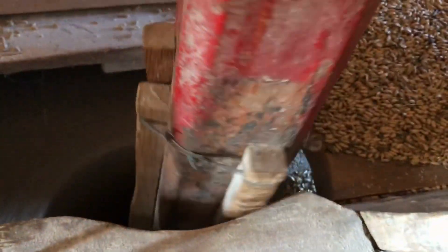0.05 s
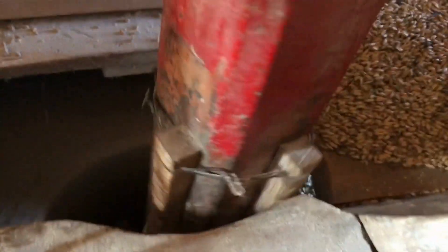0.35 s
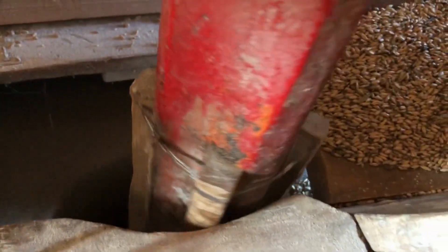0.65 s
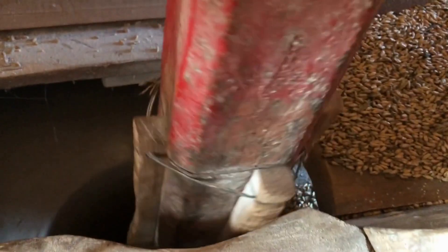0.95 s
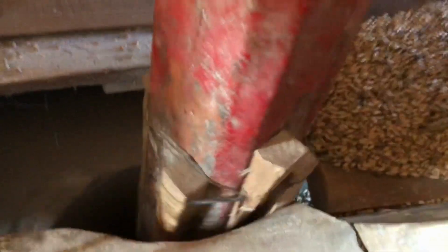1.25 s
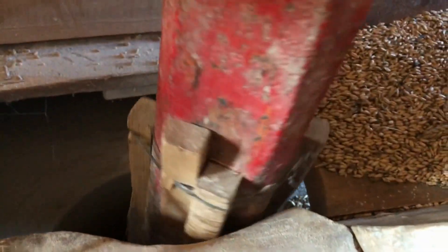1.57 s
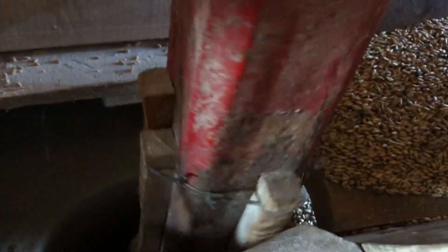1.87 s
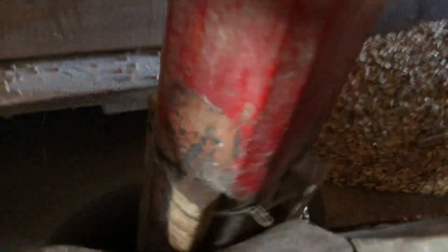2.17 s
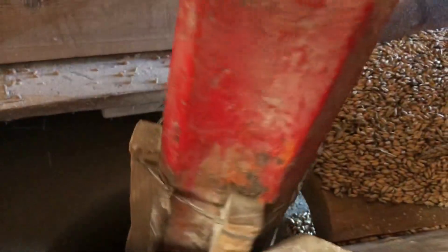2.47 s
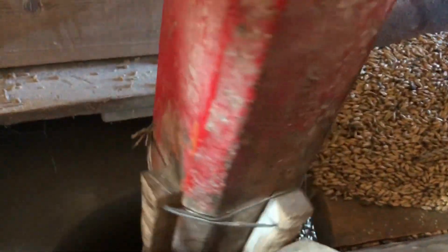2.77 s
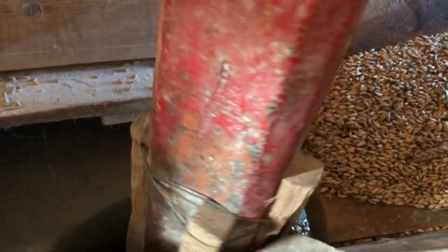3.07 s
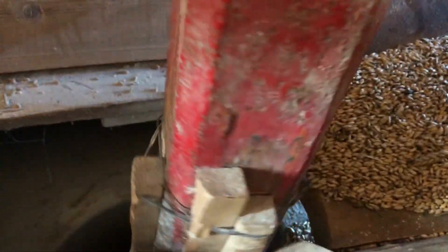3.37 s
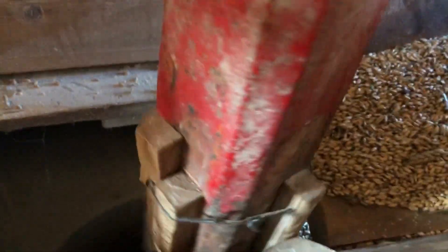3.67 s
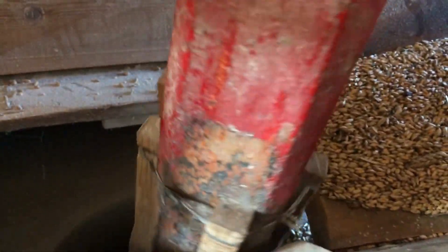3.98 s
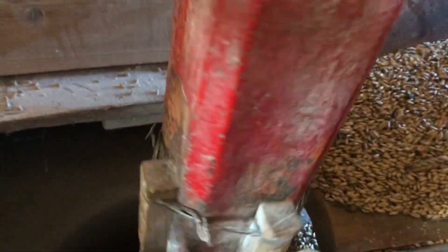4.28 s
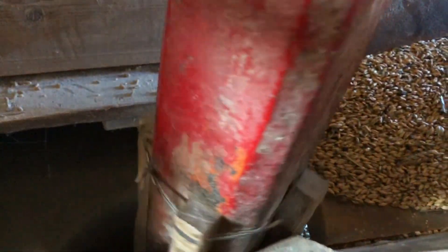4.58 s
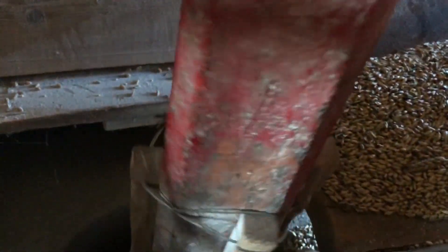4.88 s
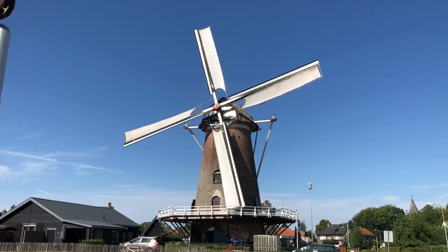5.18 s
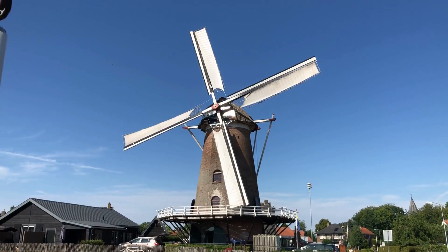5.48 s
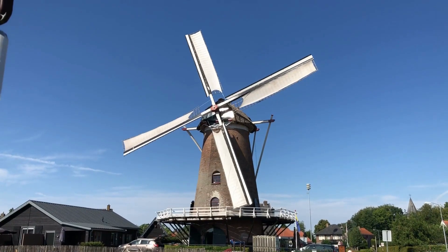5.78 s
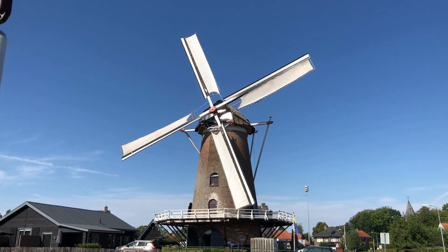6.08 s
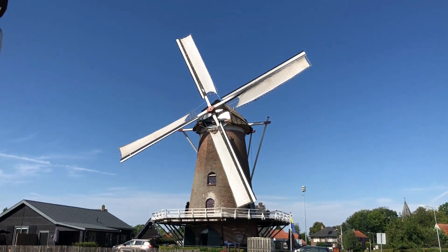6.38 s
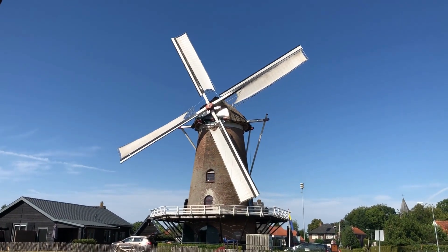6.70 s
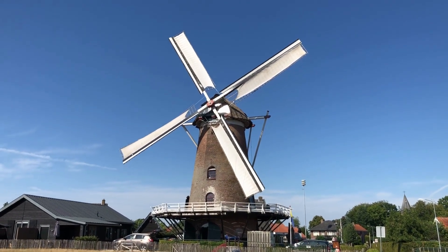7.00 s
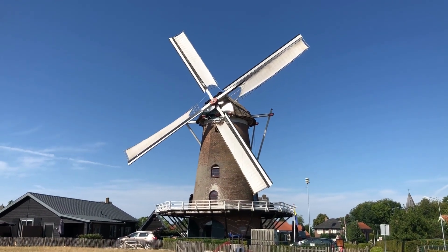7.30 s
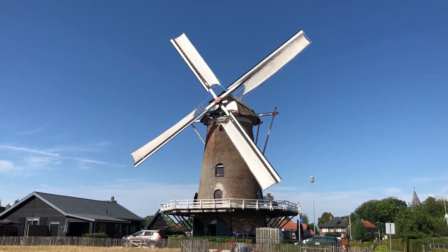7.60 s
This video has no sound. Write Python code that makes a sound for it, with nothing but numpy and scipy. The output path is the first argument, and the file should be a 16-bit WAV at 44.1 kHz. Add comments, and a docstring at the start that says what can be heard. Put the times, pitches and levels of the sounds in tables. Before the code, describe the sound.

A windmill's stones grind grain under regular wooden knocks and wire clinks, then everything drops suddenly to faint outdoor wind and traffic.

```python
"""A windmill's runner stone grinding grain, heard close by on the stone floor, with the wooden gearing
rumbling through casing and boards. The square shaft knocks the feed shoe four times a turn; the blocks
wired to the shoe chatter, the wire clinks and kernels tick down.
Then the scene cuts to the quiet outdoors: distant traffic, two soft gusts on the microphone,
a bird and a few faint sounds far off."""
import sys
import numpy as np
from scipy import signal
from scipy.fft import rfft, irfft, next_fast_len
from scipy.io import wavfile
from scipy.ndimage import uniform_filter1d, minimum_filter1d

SR = 44100
rng = np.random.default_rng(int(sys.argv[2]) if len(sys.argv) > 2 else 0)


def inscribe(sig):
    """Save sig as 16-bit PCM at rate SR to the path in sys.argv[1].

    A 1-D sig is mono; a 2-D sig holds one channel per row.
    Samples are clipped to [-1, 1] before scaling.
    """
    pcm = np.round(np.clip(np.atleast_2d(sig).T, -1, 1) * 32767)
    wavfile.write(sys.argv[1], SR, pcm.astype(np.int16))


N = 346185

# Colour of small hard ticks. Each row: frequency in Hz, spectral level in dB.
TICK_COLOUR = [(2000, -17.5), (4300, -7.5), (5500, 2), (7500, 0), (10000, -6), (12000, -5.5), (16000, -2.5)]
# A corner of the shaft pushes the shoe aside. Each row: time in seconds, then levels in dB
# of the shoe's groan, the frame's thud and the wire's buzz.
SHAFT_CORNERS = [(.385, -28, -22, -2), (.865, -23, -29.5, -0.5), (1.33, -27.5, -27, 4.5),
                 (1.776, -23.5, -26, -5), (2.275, -32, -21, -0.5), (2.765, -23, -29.5, 1),
                 (3.25, -33, -28.5, -0.5), (3.74, -26, -25, -0.5), (4.205, -28.5, -20.5, 0),
                 (4.719, -25, -35, -2.5)]


def from_db(db):
    """Decibels to gain."""
    return 10 ** (np.asarray(db) / 20)


def rms_one(x):
    """Scale to unit rms."""
    return x / np.sqrt(np.mean(x ** 2) + 1e-20)


def clock():
    """Time of every sample in seconds."""
    return np.arange(N) / SR


def curve(points):
    """Straight lines through (seconds, value) points, at every sample."""
    return np.interp(clock(), *np.transpose(points))


def noise(colour):
    """Unit-rms noise shaped by (Hz, dB) points, rolled off below the first."""
    hz, level_db = np.transpose(colour)
    size = next_fast_len(N)
    bins = np.maximum(np.arange(size // 2 + 1) * SR / size, 1)
    gain = from_db(np.interp(np.log(bins), np.log(hz), level_db)) * np.minimum(bins / hz[0], 1) ** 2
    return rms_one(irfft(rfft(rng.standard_normal(size)) * gain, size)[:N])


def drift(per_s):
    """Unit-rms wander between random values."""
    knots = rng.standard_normal(4000)
    return rms_one(np.interp(clock() * per_s, np.arange(len(knots)), knots))


def resonate(x, hz, width_hz):
    """Two equal resonators in series, with gain 1 at the peak."""
    r = np.exp(-np.pi * width_hz / SR)
    b, a = np.array([1, 0, -1]) * (1 - r * r) / 2, [1, -2 * r * np.cos(2 * np.pi * hz / SR), r * r]
    return signal.lfilter(b, a, signal.lfilter(b, a, x + 1e-18))


def body(modes):
    """Resonances (Hz, width in Hz, dB), each shaken by its own random force; unit rms."""
    shaken = [from_db(db) * resonate(rng.standard_normal(N), hz, 2 * width) for hz, width, db in modes]
    return rms_one(sum(shaken))


def ring(force, hz, t60):
    """One mode: a unit impulse starts a sine of height 1 that falls 60 dB in t60 seconds."""
    r, w = from_db(-60 / (t60 * SR)), 2 * np.pi * hz / SR
    return signal.lfilter([0, np.sin(w)], [1, -2 * r * np.cos(w), r * r], force + 1e-18)


def steady(x, span_s, share):
    """Even out a share of the swells of a noise; unit rms."""
    power = uniform_filter1d(x ** 2, max(int(span_s * SR), 2))
    return rms_one(x / (np.abs(power) + 1e-6) ** (share / 2))


def clicks(times, level_db, sign=1):
    """One impulse for each event."""
    out = np.zeros(N)
    out[np.round(np.asarray(times) * SR).astype(int)] = sign * from_db(level_db)
    return out


def fade(hits, t60):
    """Envelope of impulses whose energy falls 60 dB in t60 seconds."""
    return np.sqrt(signal.lfilter([1], [1, -10 ** (-6 / (t60 * SR))], hits ** 2 + 1e-18))


def swell(envelope, rise_s):
    """Round off an attack."""
    r = np.exp(-1 / (rise_s * SR))
    return signal.lfilter([1 - r], [1, -r], envelope)


def hump(peak_s, half_s):
    """Bell-shaped envelope, down to 1/e at half_s either side of its peak."""
    return np.exp(-np.minimum(((clock() - peak_s) / half_s) ** 2, 20))


def surge(peak_s, rise_s, fall_s):
    """Envelope that rises and falls exponentially about a sharp peak."""
    late = clock() - peak_s
    return np.exp(-np.minimum(np.maximum(-late / rise_s, late / fall_s), 20))


def rough_tones(rows):
    """Short bands of noise that swell and fade."""
    out = np.zeros(N)
    for s, hz, width_hz, half_s, db in rows:
        tone = rms_one(resonate(rng.standard_normal(N), hz, width_hz))
        out += from_db(db) * tone * hump(s, half_s)
    return out


def distance():
    """Far-off traffic hums in the open air, with a few faint, brief sounds."""
    # Colour of the hum. Each row: frequency in Hz, spectral level in dB.
    traffic = [(15, -53), (25, -20), (43, -16), (61, 0), (80, 0.5), (108, -12.5), (141, -4), (223, -8.5),
               (293, -13), (363, -12), (489, -17), (863, -22), (962, -25), (5880, -30.5), (16000, -41)]
    # Each row: peak time in seconds, pitch in Hz, width in Hz, half-length in seconds, level in dB.
    far_sounds = [(6.3, 860, 60, 0.083, -73), (7.135, 1930, 1000, 0.051, -77),
                  (7.635, 1304, 1400, 0.019, -66)]
    return from_db(-63) * noise(traffic) + rough_tones(far_sounds)


def bird(fall_hz_per_s=9800):
    """A distant bird gives short, raspy notes that glide down."""
    # Each row: peak time in seconds, pitch in Hz, level in dB.
    chirps = [(6.745, 3480, -81), (7.103, 2125, -75), (7.13, 2080, -73), (7.162, 2050, -78),
              (7.165, 2500, -78)]
    out, rasp = np.zeros(N), .9 * drift(450)
    for s, hz, db in chirps:
        t = clock() - s
        note = np.sqrt(2) * np.sin(2 * np.pi * (hz - fall_hz_per_s * t / 2) * t + rasp)
        out += from_db(db) * note * hump(s, half_s=.013)
    return out


def breeze(lumps_db=1.0):
    """Wind reaches the microphone in short, lumpy buffets, two of them stronger."""
    # Each row: peak time in seconds, level in dB.
    buffets = [(5.96, -60), (6.22, -65), (6.65, -62), (6.79, -55), (6.89, -46.5), (7.01, -54), (7.125, -59),
               (7.425, -61), (7.49, -60), (7.605, -46), (7.67, -53), (7.755, -55), (7.835, -57)]
    # Each row: frequency in Hz, spectral level in dB.
    wind_colour = [(25, -7), (65, 3), (105, -3), (160, -3), (250, -15), (400, -34), (1200, -40),
                   (5000, -72)]
    gusts = sum(from_db(db) * surge(s, rise_s=.027, fall_s=.036) for s, db in buffets)
    return gusts * from_db(lumps_db * drift(40)) * steady(noise(wind_colour), span_s=.061, share=.79)


def squeaks():
    """Wood rubs with a thin squeak."""
    # Each row: peak time in seconds, pitch in Hz, width in Hz, half-length in seconds, level in dB.
    rubs = [(3.075, 4240, 400, .018, -41), (3.08, 2760, 400, .03, -44), (3.108, 4170, 400, .008, -39)]
    return rough_tones(rubs)


def kernels(per_s=30, spread_db=4.5, skitter_db=-10):
    """Kernels drop at random, tick on the stone and skitter on."""
    # Level of the kernel ticks, which grow fainter. Each row: time in seconds, level in dB.
    tick_levels = [(0, -46.5), (1.8, -45.5), (2.6, -53), (3.4, -54), (5.04, -60.5)]
    drops = rng.random(N) < per_s / SR
    hits = drops * from_db(curve(tick_levels) + spread_db * np.clip(rng.standard_normal(N), -2, 2))
    return noise(TICK_COLOUR) * (fade(hits, t60=.024) + from_db(skitter_db) * fade(hits, t60=.12))


def wire_clinks(tick_db=-4, grain_db=3, ring_db=-3, fade_in_db=-8, width_hz=170):
    """The wire clinks: a grainy tick and a ring that fades in briefly."""
    # Each row: time in seconds, level in dB, place on the wire.
    clinks = [(0.145, -35, "long"), (.203, -40, "slack"), (0.251, -40, "slack"), (.613, -40, "long"),
              (0.638, -35.5, "long"), (0.756, -37, "taut"), (.794, -44, "short"), (1.1, -33.5, "taut"),
              (1.147, -37.5, "long"), (1.202, -38.5, "taut"), (1.591, -31, "slack"), (1.65, -29, "slack"),
              (1.678, -34, "long"), (1.747, -28.5, "taut"), (1.974, -44, "slack"), (2.031, -41, "short"),
              (2.545, -36, "long"), (3.045, -32, "taut"), (3.508, -30, "slack"), (3.591, -27, "slack"),
              (3.6, -33.5, "slack"), (3.697, -32.5, "taut"), (4.086, -33, "short"), (4.49, -29, "long")]
    # Each entry: a place on the wire and the frequencies of its modes in Hz.
    wire_modes = {"long": (3000, 4850, 5500, 9950), "slack": (7000, 7600, 8350),
                  "taut": (9150, 10450, 11300), "short": (9400, 10800, 13560)}
    out = np.zeros(N)
    tick = from_db(tick_db) * rms_one(noise(TICK_COLOUR) * from_db(grain_db * drift(370)))
    for place, modes_hz in wire_modes.items():
        hits = sum(clicks(s, db) for s, db, where in clinks if where == place)
        fade_in = from_db(fade_in_db) * fade(hits[::-1], t60=.051)[::-1]
        decay = fade(hits, t60=.07)
        modes = body([(hz, width_hz, 0) for hz in modes_hz])
        rings = from_db(ring_db) * steady(modes, span_s=.0054, share=.8)
        out += tick * swell(decay, rise_s=.00082) + rings * swell(decay + fade_in, rise_s=.0008)
    return out


def wire_buzz(hits, twang_db=-18.5, settle_db=-23, rough_db=4.5):
    """The wire twangs at each hit and buzzes on while the blocks settle."""
    # Each row: frequency in Hz, width in Hz, level in dB.
    buzz_modes = [(3915, 180, 11), (6230, 2400, -2), (9200, 400, -2), (11300, 350, -5.5),
                  (14240, 3700, -13)]
    shake = np.hypot(from_db(twang_db) * fade(hits, t60=.062), from_db(settle_db) * fade(hits, t60=.38))
    looseness = from_db(curve([(s, db) for s, _, _, db in SHAFT_CORNERS]))
    buzz = rms_one(steady(body(buzz_modes), span_s=.012, share=.7) * from_db(rough_db * drift(130)))
    return looseness * swell(shake, rise_s=.00082) * buzz


def block_chatter(crack_db=1.5, crack_t60=.011, grit_rough_db=2, ring_db=-12, clack_spread_db=3,
                  rebounds_per_s=100, rebound_db=-29):
    """Loose blocks snap against the shoe: each contact cracks, rings, clacks and shakes the wire."""
    # A cluster of contacts to each knock. Each row: time in seconds, level in dB.
    contacts = [(0.3755, -23), (0.383, -25), (0.388, -11.5), (0.406, -11.5), (0.413, -11.5), (.447, -27.5),
                (.4686, -27.5), (0.8454, -19.5), (.8534, -30), (0.8573, -14.5), (0.866, -25.5),
                (0.8757, -20), (0.884, -20.5), (.903, -29), (0.906, -31.5), (1.3323, -14.5), (1.338, -33.5),
                (1.3506, -13), (1.3863, -24.5), (1.399, -30), (1.407, -32), (1.7826, -10.5), (1.7858, -18),
                (1.805, -18), (1.8198, -13), (1.8257, -30), (2.2801, -12.5), (2.298, -11.5), (2.3096, -18),
                (2.3234, -25.5), (2.330, -24), (2.3358, -20), (2.3505, -27), (2.372, -33), (2.746, -13),
                (2.749, -24.5), (2.754, -15), (2.788, -32), (3.246, -12), (3.2517, -23.5), (3.2642, -14),
                (3.290, -32), (3.302, -24), (3.73, -16), (3.7345, -13.5), (3.7515, -22.5), (3.7636, -20.5),
                (4.204, -15.5), (4.2086, -14), (4.215, -17.5), (4.233, -11.5), (4.242, -10), (4.2592, -22),
                (4.7069, -16.5), (4.712, -13.5), (4.7182, -17.5), (4.731, -27), (4.7373, -32.5),
                (4.773, -36)]
    # Ring of the wired blocks, and their wooden clack. Each row: Hz, level in dB, t60 in seconds.
    ring_modes = [(3855, -6, .06), (3950, -8, .06), (4065, -11, .1), (5250, -15, .04), (5900, -11, .03),
                  (6150, -11, .03), (6930, -11, .045), (7480, -9, .035), (9020, 1, .03), (9115, 1, .04),
                  (9395, -.5, .045), (10130, -12, .04), (10440, -5, .04), (10920, -6, .045),
                  (11270, -3, .03), (11390, -4, .035), (11610, -4, .035), (12780, -12, .04)]
    clack_modes = [(930, -16.5, .035), (1036, -15, .04), (1270, -18.5, 0.024), (1520, -17.5, .035),
                   (1720, -15, 0.026), (2220, -25, 0.024), (2660, -27, 0.018), (3270, -25.5, 0.038)]
    # Colour of the crack. Each row: frequency in Hz, spectral level in dB.
    grit_colour = [(1200, -5), (2200, -10), (3200, -12), (3900, -9.5), (4700, -17), (6000, -9.5),
                   (7500, -8), (8100, -17), (8650, -8), (9100, 7), (9450, 3), (9800, -10), (10400, -1),
                   (10700, -5), (11300, 5), (11750, 1), (12300, -16), (12750, -6), (13300, -12),
                   (16000, -14)]
    times, contact_db = np.transpose(contacts)
    hits = clicks(times, contact_db)
    rebounds = (rng.random(N) < rebounds_per_s / SR) * from_db(rebound_db) * fade(hits, t60=.1)
    pressure = swell(fade(hits + rebounds, crack_t60), rise_s=.00066)
    # a gritty push with the energy of one impulse gives each mode a strength of its own
    force = pressure * rng.standard_normal(N) / np.sqrt(crack_t60 * SR / np.log(10 ** 6))
    rings = sum((-1) ** k * from_db(db + ring_db) * ring(force, hz, t60)
                for k, (hz, db, t60) in enumerate(ring_modes))
    grit = steady(noise(grit_colour), span_s=.0015, share=.86) * from_db(grit_rough_db * drift(700))
    crack = from_db(crack_db) * pressure * rms_one(grit)
    # each contact lands on another spot of the wood, which changes the mix of its modes
    spot = rng.standard_normal((len(times), len(clack_modes), 2))
    clack = 0
    for k, (hz, db, t60) in enumerate(clack_modes):
        strikes = clicks(times, contact_db + clack_spread_db * spot[:, k, 0], np.sign(spot[:, k, 1]))
        clack += from_db(db) * ring(strikes, hz, t60)
    return rings + crack + clack + wire_buzz(hits)


def feed_shoe(blow_db=-3.5, tail_db=-2, thud_lag_s=.032):
    """Each corner of the shaft makes the shoe groan, shakes its wood and, a moment later, its frame."""
    # A corner strikes the shoe, then rebounds onto it. Each row: time in seconds, level in dB.
    knocks = [(.378, -18.5), (.4075, -20.5), (0.848, -24.5), (.859, -22), (1.3327, -21), (1.351, -23.5),
              (1.784, -21), (1.805, -31), (1.819, -38), (2.277, -18), (2.299, -25.5), (2.748, -22.5),
              (3.244, -20), (3.265, -27.5), (3.731, -21), (3.753, -33.5), (4.206, -19), (4.233, -24),
              (4.708, -26.5), (4.717, -31)]
    # The struck shoe, the pushed shoe and the frame. Each row: frequency in Hz, width in Hz, level in dB.
    wood_modes = [(440, 12, 0.5), (910, 28, -1), (1009, 140, 2.5), (1290, 220, -3.5), (1504, 58, -6.5),
                  (1685, 67, -2.5), (2680, 1600, -24.5)]
    groan_modes = [(341, 28, -5), (380.5, 6.4, 2), (414, 32, -1), (463, 25, 0.5)]
    frame_modes = [(36, 10, -15.5), (70, 5.6, -3.5), (115, 22, 0)]
    blows = clicks(*np.transpose(knocks))
    shake = np.hypot(from_db(blow_db) * fade(blows, t60=.047), from_db(tail_db) * fade(blows, t60=.3))
    wood = swell(shake, rise_s=.00081) * steady(body(wood_modes), span_s=.0057, share=1)
    push, jolt = 0, 0
    for s, groan_db, thud_db, _ in SHAFT_CORNERS:
        push += from_db(groan_db) * hump(s, half_s=.08)
        jolt += from_db(thud_db) * surge(s + thud_lag_s, rise_s=.02, fall_s=.04)
    groan = push * steady(body(groan_modes), span_s=.051, share=.55)
    thud = jolt * steady(body(frame_modes), span_s=.04, share=.68)
    return wood + groan + thud


def gearing(cog_hz=15, cog_depth=.14, wander_db=.63):
    """Cogs jolt the wooden casing and floor, whose boom surges and sags."""
    # Each row: frequency in Hz, width in Hz, level in dB.
    casing_modes = [(141.5, 12, -17), (166.9, 5, 1.5), (182, 10, 2), (204, 9.5, -4.5), (227.7, 15, -8)]
    # Each row: time in seconds, level in dB.
    boom_levels = [(0, -15.5), (.2, -18), (.33, -19.5), (.6, -17), (.76, -16), (.98, -20), (1.14, -15),
                   (1.38, -13.5), (1.52, -20), (1.67, -15.5), (1.74, -22.5), (2, -18), (2.1, -15.5),
                   (2.18, -20.5), (2.4, -14), (2.55, -21.5), (2.7, -14.5), (2.8, -25.5), (2.88, -18),
                   (3.1, -18), (3.35, -14), (3.6, -22), (3.82, -20.5), (3.9, -16.5), (4.1, -19),
                   (4.21, -20), (4.58, -16), (4.8, -22.5), (5.04, -18)]
    boom_db = curve(boom_levels) + wander_db * drift(22)
    cog_phase = 2 * np.pi * (cog_hz * clock() + .2 * drift(2.6))
    jolts = 1 + cog_depth * (np.cos(cog_phase) + .5 * np.cos(3 * cog_phase))
    return from_db(boom_db) * steady(body(casing_modes), span_s=.054, share=.85) * rms_one(jolts)


def millstones(turn_s=1.92, fastest_s=.75, pitch_swing=.03, wander_db=1.0,
               crush_db=-22.5, crush_follow=.072, rough_db=1.5, echo_s=1 / 185, echo_gain=.27):
    """The stones rub unevenly as the runner turns, and crush the grain between them."""
    # Each row: frequency in Hz, width in Hz, level in dB.
    stone_modes = [(379, 37, -13), (552.8, 32, 1), (746.3, 33, -11.5), (939, 70, -16), (1400, 29, -19.5),
                   (2714, 60, -31)]
    # Each row: time in seconds, level in dB.
    rub_levels = [(0, -22.5), (.18, -23), (.3, -22), (.58, -23), (.8, -22.5), (1.25, -24), (1.43, -24.5),
                  (1.7, -24.5), (1.85, -24.5), (2.18, -21), (2.42, -24.5), (2.8, -22), (2.95, -25),
                  (3.05, -24), (3.3, -26), (3.65, -22.5), (3.85, -23), (3.97, -27), (4.12, -21),
                  (4.25, -27.5), (4.42, -22.5), (4.53, -27.5), (4.72, -22), (5.04, -26)]
    # Each row: frequency in Hz, spectral level in dB.
    crush_colour = [(25, -29), (48, -20), (68, -6), (125, 2.5), (260, 6), (310, -2), (390, -1.5), (500, 3),
                    (690, -18.5), (1050, -9.5), (1450, -15.5), (2100, -23.5), (5000, -32.5), (16000, -42.5)]
    t = clock()
    # the stone runs slightly out of true, so its pitch swings with the turn
    angle = 2 * np.pi * (t - fastest_s) / turn_s
    swung_time = t + pitch_swing * turn_s / (2 * np.pi) * np.sin(angle)
    rub_db = curve(rub_levels) + wander_db * drift(24)
    rub = from_db(rub_db) * np.interp(swung_time, t, steady(body(stone_modes), span_s=.07, share=.36))
    # the crushing noise bounces across the casing, which ripples its colour
    crush = noise(crush_colour)
    echo = echo_gain * np.interp(t - echo_s, t, crush)
    crush = np.interp(swung_time, t, rms_one(crush + echo))
    flutter_db = crush_follow * (rub_db - rub_db.mean()) + rough_db * drift(120)
    return rub + from_db(crush_db + flutter_db) * crush


def scene(cut_s=5.037, crossfade_s=.002):
    """One microphone position on the stone floor, then suddenly one in the open air."""
    inside = np.clip((cut_s - clock()) / crossfade_s + .5, 0, 1)
    mill = gearing() + millstones() + feed_shoe() + block_chatter() + wire_clinks()
    mill += kernels() + squeaks()
    outdoors = breeze() + distance() + bird()
    return (inside * mill + (1 - inside) * outdoors)[None]


def record(dry):
    """A quick limiter holds the highest peaks down; the top is cut steeply."""
    ceiling, cutoff_hz = .66, 15800
    allowed = np.minimum(ceiling / (np.abs(dry) + 1e-9), 1)
    gain = uniform_filter1d(minimum_filter1d(allowed, size=200), size=200)
    return signal.sosfilt(signal.ellip(10, .1, 80, cutoff_hz, fs=SR, output="sos"), gain * dry)


dry = scene()
out = record(dry)
inscribe(out)
```